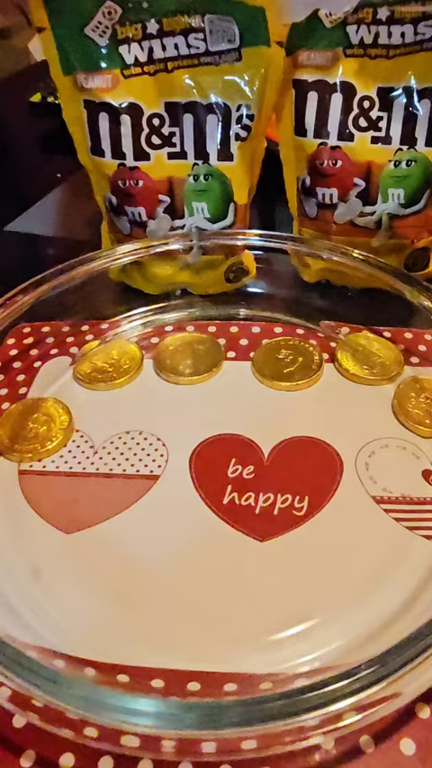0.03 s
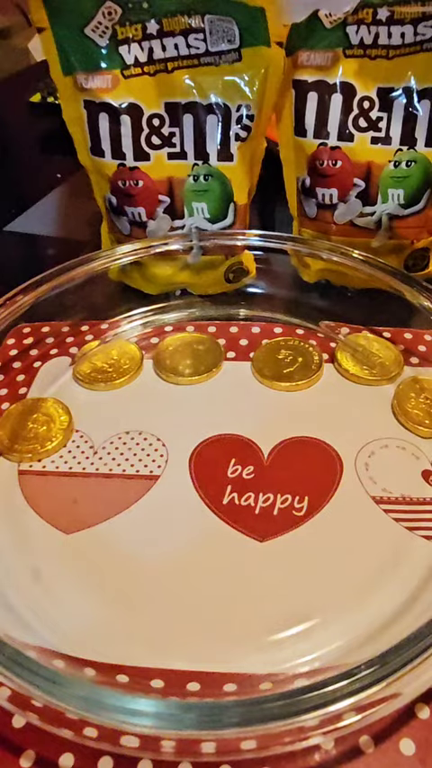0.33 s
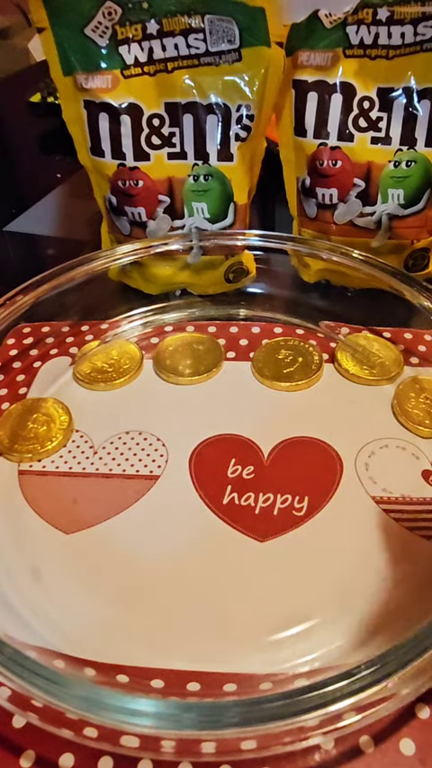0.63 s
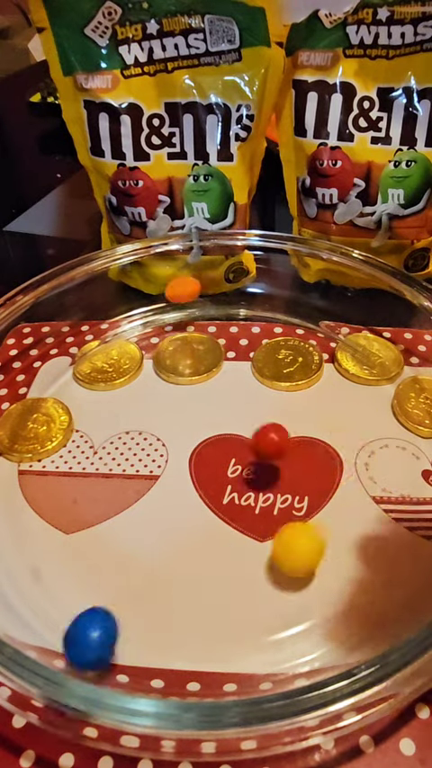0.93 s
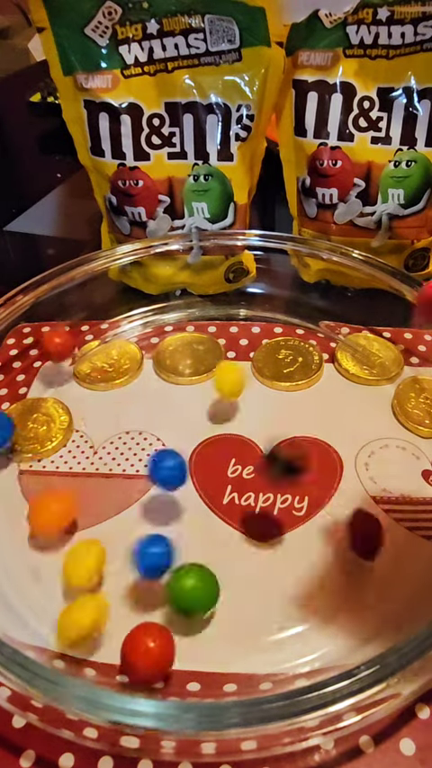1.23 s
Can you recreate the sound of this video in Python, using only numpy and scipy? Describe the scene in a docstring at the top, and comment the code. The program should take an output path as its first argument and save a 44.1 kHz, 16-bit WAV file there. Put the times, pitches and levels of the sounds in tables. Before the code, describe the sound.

Hard candies clatter into a glass dish, close and slightly left in a small room. First a plastic bag crackles softly from about 0.3 seconds as they slide out. From 0.8 seconds they strike the glass with bright, short clinks and bounces over faint low thuds. The pour thins briefly near 1.8 seconds, picks up at 2, and rattles on densely until about 3.8 seconds.

```python
"""Hard candies into a glass dish

A plastic bag crackles and bumps close to the microphones as hard candies slide and roll to its mouth.
They drop into a glass dish, ring it, bounce and click together; the growing heap damps the ring.
The table knocks faintly, and short, dry low thuds sit under some of the drops. A small room answers,
and the loudest hits are limited and clipped."""
import sys
import numpy as np
from scipy import signal
from scipy.fft import rfft, irfft, next_fast_len
from scipy.io import wavfile
from scipy.ndimage import uniform_filter1d

SR = 44100
rng = np.random.default_rng(int(sys.argv[2]) if len(sys.argv) > 2 else 0)


def wrap_up_sound(samples):
    """Save the sound to the file named by the first command line argument, as 16-bit audio."""
    columns = np.atleast_2d(samples).T
    # keep every value between -1 and 1, then stretch to whole-number steps
    tamed = np.clip(columns, -1, 1)
    steps = np.round(tamed * 32767).astype(np.int16)
    wavfile.write(sys.argv[1], SR, steps)


N = 176400

# swells of the bag's rustle (time [s], level [dB])
RUSTLE_LEVEL = [(.11, -88), (.14, -65), (.265, -65), (.285, -53), (.325, -51), (0.353, -27.5), (.385, -51),
                (0.442, -25), (.53, -29.5), (.6, -29), (.68, -26.5), (.79, -29.5), (1.65, -59), (3.5, -38),
                (4, -46)]
# tone of the plastic film (frequency [Hz], relative level [dB])
FILM_TONE = [(100, -12), (700, 0.5), (1500, -2), (2500, -4.5), (7700, -2), (15500, -18.5)]
# single snaps of the film (time [s], level [dB], resonance [Hz])
FILM_SNAPS = [(0.1807, -40.5, 1690), (0.279, -21.5, 1310), (.293, -29, 1400), (0.395, -14.5, 1280),
              (0.3985, -19.5, 12400), (.466, -11.5, 1300), (0.5113, -9.5, 2930), (0.633, -31, 1400)]
# candies rolling to the bag's mouth (time [s], level [dB])
ROLL_LEVEL = [(.3, -51), (.46, -33.5), (.6, -41), (.635, -30), (.655, -47), (.685, -29.5), (.79, -40),
              (1.0, -63)]
# tone of the bag's cavity (frequency [Hz], relative level [dB])
HOLLOW_TONE = [(25, 3), (90, 8.5), (380, -0.5), (690, 5.5), (1100, -13.5), (3000, -35)]
# dull bumps from handling the bag (time [s], level [dB])
BAG_BUMPS = [(0.464, -30), (0.521, -28), (2.582, -28), (3.148, -31), (3.501, -23), (3.613, -21.5)]
# candies striking the dish (time [s], strength [dB], brightness [dB/octave])
CANDY_DROPS = [(0.7877, -7.5, 2.5), (0.8158, -0.5, -1), (0.8496, -3, -5), (0.8675, -1, -1),
               (0.8871, 0.5, -2), (0.9097, -5.5, -2.0), (0.9467, -6.0, 0), (0.9691, -8.5, -4),
               (1.0618, -3, -3.5), (1.104, -6, -1), (1.1453, -9.5, 3), (1.164, -3.5, 0.5),
               (1.2155, -4.5, 4), (1.2272, -5, -8.5), (1.2665, -5, 2.5), (1.3456, 0, -3), (1.3871, 0, 0),
               (1.4597, -21, -11), (1.4761, -7.5, 7), (1.4879, -5.5, 2.5), (1.5264, -4.5, -0.5),
               (1.5721, -7, 1), (1.6214, -19.0, -6), (1.6968, -1, -1), (1.7376, -3, -0.0),
               (1.8083, -13, -3.5), (1.8157, -16.5, 1.5), (1.8578, -15.5, 1.5), (1.9013, -13.5, 6),
               (1.9499, -2, 1.0), (1.981, -3, 4), (2.0053, -12, 11), (2.0407, 2, -4.5), (2.073, -2.5, -2.5),
               (2.103, -8, -1), (2.1481, -2, -0.5), (2.1717, -2.5, -0.5), (2.2035, -30, 1),
               (2.2284, -3.5, 1), (2.2497, 0, -4), (2.3399, -8.5, 3), (2.364, -13.5, 8), (2.435, -5, 0),
               (2.5104, -7.5, 0), (2.555, -10, 2), (2.571, -5.5, -0.5), (2.5989, -8, 2), (2.6669, -10, 1),
               (2.7119, -3.5, -0.5), (2.7744, -7, 1.5), (2.8091, -2.5, -2), (2.8522, -5, -2),
               (2.8879, -6.5, -0.5), (2.9173, -2.5, -5), (2.9719, -4, 3), (3.0103, -4, 0.5),
               (3.0625, -7, 3), (3.0922, -9, -2.5), (3.1278, -5.5, 0.5), (3.1557, -4.5, -2.5),
               (3.1873, -9.5, 1), (3.241, -8, -2.5), (3.2611, -5, -0.5), (3.3025, -15.5, 0),
               (3.3174, -7, -0.5), (3.34, -10, 3.5), (3.38, -13, 1), (3.4175, -7.5, 0.5), (3.4382, -5.5, 3),
               (3.4701, -9, 0.5), (3.483, -8, 2), (3.5032, -15, 5), (3.5358, -3, -0.5), (3.5674, -5.5, -2),
               (3.578, -5.5, 4), (3.6086, -3.5, -2), (3.632, -5, 0), (3.6486, -0.5, -1.5),
               (3.7081, -6, 2.5), (3.733, -9, 0), (3.7525, -2.5, -0.5), (3.7873, -8.5, -0.5),
               (3.8309, -12.5, -2)]
# modes of the empty dish (frequency [Hz], relative level [dB], t60 [s])
GLASS_MODES = [(1153, -6, .06), (2060, 2.5, .036), (3160, 1.5, .048), (3832, -2, .05), (4620, 4, .062),
               (5010, -1, .045), (5472, -13, .13), (5835, -7, .055), (6328, 9, .06), (6845, -9, .1),
               (7256, -10, .07), (7452, -5.5, .09), (8225, 2, .075), (8622, -12, .12), (9000, -13, .09),
               (10163, -16, .12), (10455, -4, .15), (10764, -8.5, .18), (10968, -11, .14), (11241, -6, .14),
               (12782, -9, .13), (13458, -11, .14), (13608, -13, .12), (14298, -12.5, .13),
               (15325, -11.5, .1)]
# tone of a candy shell's crack (frequency [Hz], relative level [dB])
CRACK_TONE = [(600, -21), (950, 3.5), (1500, -11.5), (2000, 3), (2600, -3.5), (4600, 6.5), (7500, -7.5),
              (9600, -9.5), (12000, -49), (15500, -75)]
# stereo image of the dish (frequency [Hz], left minus right [dB])
DISH_PAN = [(1150, 5), (2056, 0), (3800, 2), (4620, 6), (6400, 3.5), (7450, 11), (11000, 14), (13000, 9)]
# average force of the small bounces (time [s], strength [dB])
BOUNCE_LEVEL = [(.79, -7), (.9, -13), (1.03, -25.5), (1.1, -11), (1.55, -18.5), (1.67, -40), (1.77, -24.5),
                (1.88, -26), (2.0, -9.5), (2.3, -15.5), (2.5, -22), (2.75, -20.5), (3.0, -11), (3.2, -16),
                (3.29, -34), (3.51, -9.5), (3.77, -16), (3.85, -36.5), (4, -36.5)]
# density of the small bounces (time [s], rate [1/s])
BOUNCE_DENSITY = [(.79, 80), (4, 190)]
# modes of the table (frequency [Hz], relative level [dB], t60 [s])
TABLE_MODES = [(60, -7, 0.065), (144, -1, 0.047), (282, 0, 0.02), (570, 3, 0.012)]
# short, dry low thuds under some of the drops (time [s], strength [dB])
LOW_THUDS = [(1.164, -22.5), (1.2652, -21), (1.3447, -27), (1.4765, -25), (1.5254, -34), (2.042, -10),
             (2.2282, -29), (2.5715, -21.5), (2.7737, -30), (2.8853, -22.5), (3.7506, -23.5)]
# length of the room's tail (frequency [Hz], t60 [s])
ROOM_DECAY = [(100, 0.053), (1500, 0.18), (5000, 0.14), (15000, 0.04)]
# EQ on the room's tail (frequency [Hz], gain [dB])
ROOM_TONE = [(100, -6), (2000, 4), (15000, 1.5)]

BAG_PAN_DB, LOW_END_PAN_DB = 2.5, 12  # left minus right
LEFT_LEAD_S, SHARED_NOISE = 0.0002543, 0.28  # the left microphone is nearer
SNAP_T60_S, SNAP_PEAK_DB = .02, 9
CRINKLES_PER_S, CRINKLE_SPREAD_DB, CRINKLE_T60_S = 600, 4, .012
BUMP_HZ, BUMP_T60_S = 67.5, 0.13
RING_DB, STRIKE_SPREAD_DB = -5.5, 4
DETUNE_HZ, HEAP_DAMPING_PER_S = 11, 0.2  # candies lying on the glass shift and damp its modes
SCATTER_DB, SCATTER_T60_S = -4, .035
CRACK_DB, CRACK_T60_S = -2, .04
DISH_LOW_CUT_HZ = 762  # the dish's rings and cracks are cut below this
BOUNCE_SPREAD_DB, BOUNCE_TILT_DB_PER_OCT = 2.5, -.7
TABLE_SEND_DB = -28
ROOM_SEND_DB, PREDELAY_S = -9, .003
LIMIT, CLIP, TOP_HZ = 1.4, 1.0, 15700
SMOOTH_S, RELEASE_DB_PER_S = .003, 100


def amp(db):
    """Decibels to gain."""
    return 10 ** (np.asarray(db) / 20)


def unit(x):
    """Scale to rms 1."""
    return x / np.sqrt(np.mean(x ** 2) + 1e-20)


def curve(points, hz):
    """Read (frequency, value) points on a log frequency axis."""
    knots, values = np.transpose(points)
    return np.interp(np.log(hz + 1), np.log(knots + 1), values)


def pan(db):
    """Left and right gains for a level difference."""
    return amp(np.array([db, -db]) / 2)


def filtered(x, response):
    """Shape x with a frequency response."""
    n = x.shape[-1]
    padded = next_fast_len(n + n // 8)
    return irfft(rfft(x, padded) * response(np.fft.rfftfreq(padded, 1 / SR)), padded)[..., :n]


def noise(tone_db, pan_points, size=N):
    """Coloured stereo noise of rms 1, partly shared by the two sides."""
    white = rng.standard_normal((3, size))
    pair = np.sqrt(SHARED_NOISE) * white[0] + np.sqrt(1 - SHARED_NOISE) * white[1:]
    return unit(filtered(pair, lambda hz: amp(tone_db(hz)) * pan(curve(pan_points, hz))))


def fade(t60, size=8192):
    """A decay that loses 60 dB in t60 seconds."""
    return np.exp(-np.log(1000) * np.arange(size) / SR / t60)


def add(track, time, sound):
    """Mix a sound in at a time in seconds."""
    part = track[..., max(round(time * SR), 0):][..., :sound.shape[-1]]
    part += sound[..., :part.shape[-1]]


def impulses(times, heights):
    """One spike for each hit."""
    return np.bincount(np.clip(times * SR, 0, N).astype(int), heights, N + 1)


def bursts(times, db, t60):
    """The envelope of many decaying bursts, summed in power."""
    power = signal.fftconvolve(impulses(times, amp(db) ** 2), fade(t60) ** 2)[:N]
    return np.sqrt(np.abs(power))


def bag_crackle(size=4096):
    """The film crinkles densely as the candies slide, with a few resonant snaps."""
    level = amp(np.interp(np.arange(N) / SR, *np.transpose(RUSTLE_LEVEL)))
    film = noise(lambda hz: curve(FILM_TONE, hz), [(1, BAG_PAN_DB)])
    snaps = np.zeros((2, N))
    for time, db, pitch in FILM_SNAPS:
        tone = lambda hz: curve(FILM_TONE, hz) + SNAP_PEAK_DB / (1 + (4 * (hz / pitch - 1)) ** 2)
        add(snaps, time, amp(db) * noise(tone, [(1, BAG_PAN_DB)], size) * fade(SNAP_T60_S, size))
    onsets = np.flatnonzero(rng.random(N) < CRINKLES_PER_S / SR)
    crinkle_db = CRINKLE_SPREAD_DB * rng.standard_normal(N)[onsets]
    crinkles = unit(bursts(onsets / SR, crinkle_db, CRINKLE_T60_S))
    return level * crinkles * film + snaps


def rolling():
    """Candies roll down the bag and stir its hollow."""
    db = np.interp(np.arange(N) / SR, *np.transpose(ROLL_LEVEL), left=-np.inf, right=-np.inf)
    return amp(db) * noise(lambda hz: curve(HOLLOW_TONE, hz), [(1, BAG_PAN_DB)])


def bag_bumps():
    """Soft low bumps as the bag is tipped and shaken."""
    tone = lambda hz: -20 * np.log10(1 + (hz / BUMP_HZ - BUMP_HZ / (hz + 1)) ** 2 / 2)
    return noise(tone, [(1, LOW_END_PAN_DB)]) * bursts(*np.transpose(BAG_BUMPS), BUMP_T60_S)


def dish_hits(contacts, heard, size=6144, stages=40):
    """Each contact cracks and rings its own mix of glass modes; the heap damps the high ones most."""
    hz, mode_db, t60 = np.transpose(GLASS_MODES)
    t, pitch_ratio = np.arange(size) / SR, hz / np.median(hz)
    stage_times = np.linspace(0, N / SR, stages)  # one set of modes per stage of filling
    loaded_hz = hz + DETUNE_HZ * rng.standard_normal((stages, len(hz)))
    loaded_t60 = t60 / (1 + HEAP_DAMPING_PER_S * stage_times[:, None] * pitch_ratio)
    modes = np.sin(2 * np.pi * loaded_hz[..., None] * t) * fade(loaded_t60[..., None], size)
    jitter = rng.standard_normal((len(contacts), 3, len(hz)))
    echo_noise = rng.standard_normal((len(contacts), 2, size // 4))
    rings = np.zeros((2, N))
    for k in np.arange(len(contacts))[heard]:
        time, db, tilt = contacts[k]
        strike, polarity, drift = jitter[k]
        mix = amp(STRIKE_SPREAD_DB * strike + mode_db + tilt * np.log2(pitch_ratio))
        mix *= np.linalg.norm(amp(mode_db)) / np.linalg.norm(mix)  # new colour, same power
        mix = mix * np.sign(polarity) * pan(curve(DISH_PAN, hz) + 2 * drift)
        ring = mix @ modes[np.abs(stage_times - time).argmin()]
        add(rings, time, amp(db + RING_DB) * scattered(ring, echo_noise[k]))
    times, db, _ = contacts[heard].T
    cracks = noise(lambda f: curve(CRACK_TONE, f), DISH_PAN) * bursts(times, db + CRACK_DB, CRACK_T60_S)
    low_cut = signal.butter(4, DISH_LOW_CUT_HZ, 'high', fs=SR, output='sos')
    return signal.sosfilt(low_cut, rings + cracks)


def scattered(ring, echo_noise):
    """Close echoes smear a ring; each side keeps its energy."""
    echoes = echo_noise * fade(SCATTER_T60_S, echo_noise.shape[-1])
    echoes *= amp(SCATTER_DB) / np.linalg.norm(echoes, axis=1, keepdims=True)
    echoes[:, 0] += 1  # the direct sound
    wet = signal.fftconvolve(ring, echoes, axes=1)
    return wet * np.linalg.norm(ring, axis=1, keepdims=True) / np.linalg.norm(wet, axis=1, keepdims=True)


def bounces(count=640):
    """Light contacts (time, strength, brightness) and which of them sound: more as the dish fills."""
    knots, rates = np.transpose(BOUNCE_DENSITY)
    span = knots[-1] - knots[0]
    offset, chance = rng.random((count, 2)).T
    level_jitter, tilt_jitter = rng.standard_normal((count, 2)).T
    times = knots[0] + span * (np.arange(count) + offset) / count
    heard = chance < np.interp(times, knots, rates) * span / count
    db = np.interp(times, *np.transpose(BOUNCE_LEVEL)) + BOUNCE_SPREAD_DB * level_jitter
    return np.c_[times, db, BOUNCE_TILT_DB_PER_OCT + tilt_jitter], heard


def knocks_and_thuds(contacts, size=8192):
    """Every contact knocks the table a little; short, dry low thuds sit under some of the drops."""
    times, db = np.r_[contacts[:, :2] + [0, TABLE_SEND_DB], LOW_THUDS].T
    t = np.arange(size) / SR
    knock = sum((-1) ** k * amp(level) * np.sin(2 * np.pi * hz * t) * fade(t60, size)
                for k, (hz, level, t60) in enumerate(TABLE_MODES))
    return pan(LOW_END_PAN_DB)[:, None] * signal.fftconvolve(impulses(times, amp(db)), knock)[:N]


def room(x, size=16384):
    """A short diffuse tail on each side; the mids hang on longest."""
    hz, t, spectrum = signal.stft(rng.standard_normal((2, size)), SR, nperseg=256)
    decay = np.exp(-np.log(1000) * t / curve(ROOM_DECAY, hz)[:, None])
    tail = signal.istft(spectrum * decay, SR, nperseg=256)[1]
    eq_and_delay = lambda f: amp(curve(ROOM_TONE, f)) * np.exp(-2j * np.pi * f * PREDELAY_S)
    tail = filtered(tail / np.linalg.norm(tail[0]), eq_and_delay)
    return signal.fftconvolve(x, tail, axes=1)[:, :N]


def scene():
    """Dish, table and bag sit close and to the left, with the room behind them."""
    drops = np.array(CANDY_DROPS)
    light, heard = bounces()
    close = dish_hits(drops, heard=slice(None)) + dish_hits(light, heard)
    close += knocks_and_thuds(np.r_[drops, light[heard]])
    close += bag_crackle() + rolling() + bag_bumps()
    left_first = lambda hz: np.exp(1j * np.pi * hz * LEFT_LEAD_S * np.array([[1], [-1]]))
    return filtered(close, left_first) + amp(ROOM_SEND_DB) * room(close)


def record(dry):
    """A fast limiter, a hard clip on the remaining peaks, then a brick-wall high cut."""
    over_db = 20 * np.log10(np.maximum(np.abs(dry).max(0) / LIMIT, 1))
    release = RELEASE_DB_PER_S * np.arange(N) / SR
    held_db = np.maximum.accumulate(over_db + release) - release
    cut_db = uniform_filter1d(held_db, int(SMOOTH_S * SR))
    clipped = np.clip(dry * amp(-cut_db), -CLIP, CLIP)
    return filtered(clipped, lambda hz: hz < TOP_HZ)


dry = scene()
out = record(dry)
wrap_up_sound(out)
```